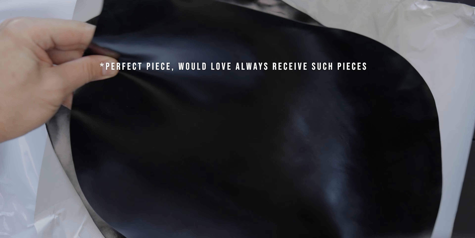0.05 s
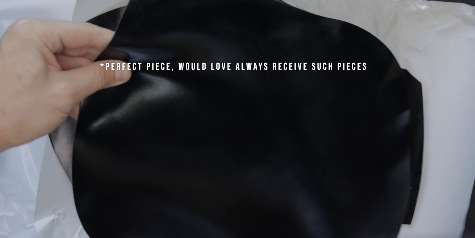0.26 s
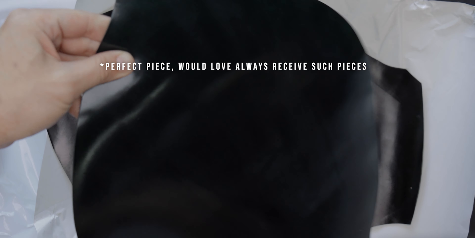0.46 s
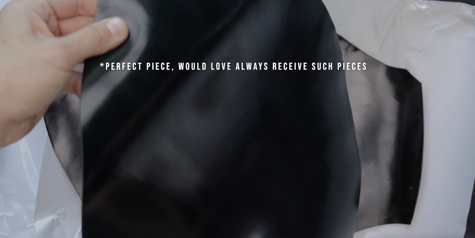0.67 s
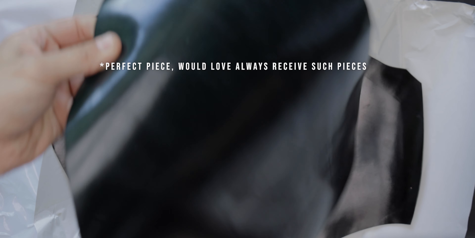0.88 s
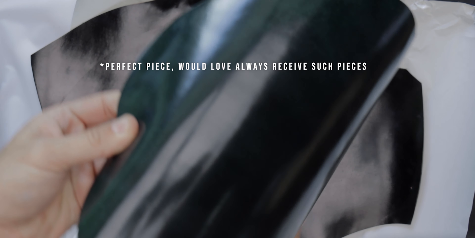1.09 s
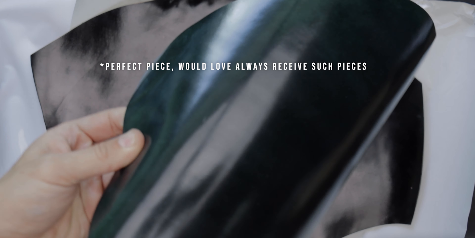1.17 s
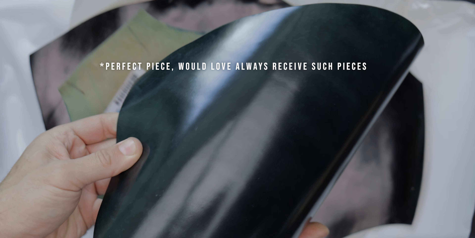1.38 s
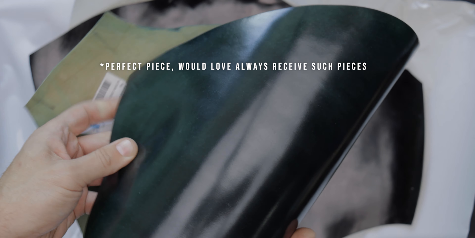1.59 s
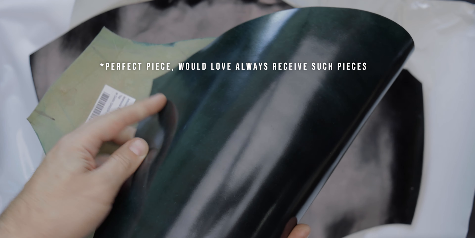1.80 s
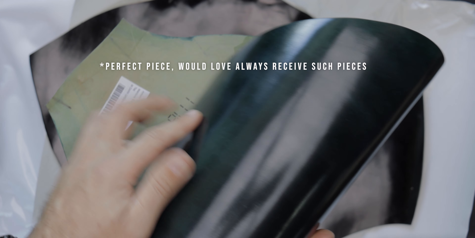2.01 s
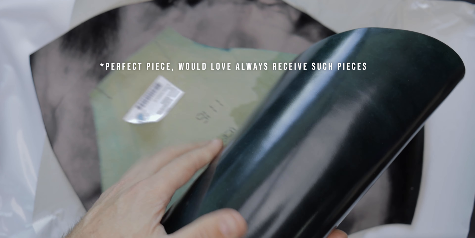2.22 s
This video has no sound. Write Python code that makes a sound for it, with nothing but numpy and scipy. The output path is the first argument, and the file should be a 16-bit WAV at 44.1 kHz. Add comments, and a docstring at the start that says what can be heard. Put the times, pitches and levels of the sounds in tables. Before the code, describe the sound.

Close up in a small room, a stiff leather hide is flexed, giving crisp snaps and soft, low flaps. It slides over other sheets with a grainy rub, bumps the table dully, and ends with a scuff and a few clicks.

```python
"""At a table in a small, echoing room, stiff leather sheets are lifted, flexed and laid over.
The hide drags over the pile with a grainy rub, a fine hiss and a hollow note from its curl.
It knocks dully on the table, flaps with soft low puffs and snaps as it buckles.
Near the end a small hard tick, probably a tag, rings briefly."""
import sys
import numpy as np
from scipy import signal
from scipy.fft import rfft, irfft
from scipy.io import wavfile
from scipy.ndimage import uniform_filter1d

SR = 44100
rng = np.random.default_rng(int(sys.argv[2]) if len(sys.argv) > 2 else 0)


def output_pcm(signal):
    """Save a mono or channel-first signal as 16-bit PCM at the path in sys.argv[1].

    Samples are clipped to [-1, 1] before scaling.
    """
    pcm = np.clip(np.atleast_2d(signal).T, -1, 1) * 32767
    wavfile.write(sys.argv[1], SR, np.round(pcm).astype(np.int16))


N = 99225
TIME = np.arange(N) / SR
CUTOFF_HZ = 16200


def from_db(db):
    """Turn decibels into a number to multiply by."""
    return 10 ** (np.asarray(db) / 20)


def rms_one(x):
    """Scale a sound so that its average strength (rms) is 1."""
    return x / np.sqrt(np.mean(x ** 2) + 1e-20)


def coloured(x, curve):
    """Make each frequency louder or softer, following (frequency [Hz], level [dB]) points."""
    hz, db = np.transpose(curve)
    bins = np.maximum(np.fft.rfftfreq(2 * N, 1 / SR), 1)
    gain = from_db(np.interp(np.log(bins), np.log(hz), db))
    return irfft(rfft(x, 2 * N) * gain)[:N]


def filtered(x, hz, keep):
    """Keep the "low" side, the "high" side or a "band" of a sound."""
    return signal.sosfilt(signal.butter(2, hz, keep, fs=SR, output="sos"), x)


def noise_band(low_hz, high_hz):
    """Noise between two frequencies, at strength 1."""
    high_hz = min(max(high_hz, low_hz * 1.1), SR * .45)
    return rms_one(filtered(rng.standard_normal(N), [low_hz, high_hz], "band"))


def resonance(hz, width_hz):
    """A band of noise with its loudness evened out: a breathy note whose pitch wanders."""
    low_hz = np.sqrt(hz ** 2 + width_hz ** 2 / 4) - width_hz / 2
    band = noise_band(low_hz, low_hz + width_hz)
    return rms_one(band / np.sqrt(uniform_filter1d(band ** 2, size=1300) + .1))


def envelope(start, rise, hold, release):
    """Loudness that climbs, stays up until hold seconds after the start, then dies away."""
    age = TIME - start
    return np.clip(age / rise, 0, 1) * np.exp(-np.clip((age - hold) / release, 0, 40))


def burst(noise, start, rise, decay):
    """A short puff of noise, with as much energy as its envelope."""
    shape = envelope(start, rise, rise, decay)
    return rms_one(noise * shape) * np.sqrt(np.mean(shape ** 2))


def ring(force, notes):
    """A push sets an object's own notes ringing, each fading at its own pace."""
    sound = 0
    for hz, db, fade_s in notes:
        shrink, turn = from_db(-60 / (fade_s * SR)), 2 * np.pi * hz / SR   # per sample
        feedback = [1, -2 * shrink * np.cos(turn), shrink ** 2]
        sound += from_db(db) * signal.lfilter([0, np.sin(turn)], feedback, force + 1e-18)
    return sound


def air():
    """The faint, steady, low rush of the room."""
    # tone of the background: (frequency [Hz], level [dB])
    tone = [(25, -9.5), (60, 4), (150, -2), (330, 5.5), (800, -3), (2000, -15.5), (6000, -21.5),
            (11000, -40.5), (16000, -47)]
    return from_db(-76.5) * rms_one(coloured(rng.standard_normal(N), tone))


def grains(per_s, spread_db=1.64):
    """Leather slides in tiny random slips of uneven size."""
    sizes = from_db(spread_db * np.minimum(rng.exponential(1, N), 4)) * rng.choice([-1, 1], N)
    return sizes * (rng.random(N) < per_s / SR)


def rub_and_hiss():
    """A coarse rub, a finer rasp, a hiss and a hollow note, mostly from the curled sheet dragging."""
    # stretches of rub and hiss: (start [s], length [s], rise [s], release [s], swell [dB],
    # rub [dB], rasp [dB], hiss [dB], hollow pitch [Hz], hollow level [dB])
    # The row at 1.151 s is a soft hiss swelling just before and through the pop at 1.2 s.
    stretches = [(0, 0.025, 0.009, 0.0037, -2, -101, -109, -110, 455, -70.5),
                 (0.042, 0.076, 0.024, 0.04, -1, -62.5, -57.5, -81, 348, -68),
                 (0.161, 0.099, 0.0034, 0.072, 11, -65, -71.5, -111, 970, -95),
                 (0.461, 0.12, 0.031, 0.048, 6.5, -55.5, -56.5, -72, 713, -61.5),
                 (0.601, 0.12, 0.031, 0.02, 1, -53.5, -50.5, -63.5, 749, -59.5),
                 (0.884, 0.1, 0.034, 0.019, 0.5, -71, -73.5, -112, 337, -74),
                 (0.95, 0.073, 0.023, 0.09, 3.5, -94, -78.5, -80, 413, -82),
                 (1.131, 0.017, 0.012, 0.015, -11.5, -59.5, -78, -82, 694, -66),
                 (1.193, 0.061, 0.031, 0.02, -12, -47.5, -78, -72.5, 600, -52.5),
                 (1.151, 0.16, 0.055, 0.021, 7.5, -104, -71.5, -71, 428, -70),
                 (1.32, 0.18, .04, 0.029, 2.5, -82.5, -64, -69, 410, -78.5),
                 (1.454, 0.087, 0.015, 0.0095, 7, -64.5, -88, -76, 501, -69.5),
                 (1.635, 0.075, 0.019, 0.017, 17.5, -62.5, -81, -100, 870, -66),
                 (1.706, 0.12, 0.029, 0.02, 2, -57, -70, -90, 517, -81),
                 (1.86, 0.048, 0.018, 0.022, 3, -53.5, -62.5, -96, 495.5, -52),
                 (1.892, 0.085, 0.063, 0.017, -2.5, -55.5, -52.5, -60.5, 479, -54),
                 (1.965, 0.2, 0.014, 0.036, -5, -73.5, -84, -64, 493, -76),
                 (2.152, 0.1, 0.024, 0.038, -7, -63.5, -66.5, -78, 486, -69.5)]
    # tones of the rub, the rasp and the hiss: (frequency [Hz], level [dB])
    rub_tone = [(40, -29), (150, -24), (300, -21.5), (450, -14.5), (650, 2.5), (1050, 3.5), (1600, -4),
                (2800, -12.5), (5000, -36), (16000, -64)]
    rasp_tone = [(100, -32), (700, -14.5), (1400, 7), (2500, 2.5), (4200, -2), (7000, -8.5), (10000, -15.5),
                 (16000, -45.5)]
    hiss_tone = [(300, -27), (800, -21.5), (1400, 4.5), (4000, 3), (8000, 5.5), (12000, 0.5), (16000, -5.5)]
    hollow_width_hz, upper_ratio, upper_db = 51.3, 1.738, -1.5
    rub_gain, rasp_gain, hiss_gain, hollow = 0, 0, 0, 0
    for start, length, rise, release, swell_db, rub_db, rasp_db, hiss_db, hz, hollow_db in stretches:
        progress = np.clip((TIME - start) / length, 0, 1)
        loudness = envelope(start, rise, length, release) * from_db(swell_db * (progress - .5))
        rub_gain += loudness * from_db(rub_db)
        rasp_gain += loudness * from_db(rasp_db)
        hiss_gain += loudness * from_db(hiss_db)
        lower = resonance(hz, hollow_width_hz)
        upper = from_db(upper_db) * resonance(hz * upper_ratio, hollow_width_hz * 2)
        hollow += loudness * from_db(hollow_db) * rms_one(lower + upper)
    judder_db = 2.5 * noise_band(21.5, 86)   # a fast, uneven shake in loudness
    rub = rms_one(coloured(grains(per_s=5000) * from_db(judder_db), rub_tone))
    rasp = rms_one(coloured(grains(per_s=13000) * from_db(judder_db / 2), rasp_tone))
    hiss = rms_one(coloured(rng.standard_normal(N), hiss_tone))
    return rub_gain * rub + rasp_gain * rasp + hiss_gain * hiss + hollow


def knocks():
    """The hide bumps the table and makes it ring; a longer touch sounds duller."""
    # bumps on the table: (time [s], level [dB], length of touch [s])
    bumps = [(.0255, -59, .0006), (.883, -58, 0.00041), (0.913, -59.5, 0.00053), (0.935, -55, 0.00035),
             (.975, -66, 0.0011), (1.141, -49, 0.0011), (1.6915, -23.5, 0.00085), (1.6987, -26, 0.00097),
             (1.7253, -33.5, 0.00026), (1.7284, -27, 0.0013), (1.8685, -41.5, 0.00056)]
    # the table's own notes: (pitch [Hz], level [dB], time to fade by 60 dB [s])
    table_notes = [(479, -0.5, 0.052), (630, 0.5, .014), (902, -9.5, 0.043), (1370, -18, .03),
                   (1920, -15.5, 0.042)]
    force = 0
    for start, db, touch in bumps:
        push = np.sin(np.pi * np.clip((TIME - start) / touch, 0, 1)) ** 2
        force += from_db(db) * push / push.sum()
    return filtered(ring(force, table_notes), hz=705, keep="high")


def flaps_and_snap_tail():
    """The swinging sheet puffs and pops; the row at 0.26 s is the loud snap's hollow, fading tail."""
    # low or hollow bursts: (time [s], level [dB], pitch [Hz], band width [Hz], rise [s], decay [s])
    bursts = [(0.049, -51.5, 246, 238, 0.0019, 0.028), (0.236, -54, 150, 280, 0.011, 0.028),
              (0.244, -51, 143, 35.7, 0.012, 0.051), (.26, -53.5, 538, 200, .01, .075),
              (.445, -62.5, 410, 283, 0.0076, .025), (.495, -67, 89, 50.4, 0.021, 0.042),
              (.55, -64.5, 148, 200, 0.011, 0.018), (.701, -62.5, 174, 260, 0.0024, 0.011),
              (0.702, -50.5, 171.4, 35.4, 0.0067, 0.035), (0.71, -44.5, 628, 216, .003, 0.012),
              (1.124, -63, 131, 330, 0.01, 0.022), (1.198, -53.5, 75, 190, 0.022, 0.026),
              (1.206, -46, 580, 50, 0.0038, 0.013), (1.235, -47, 983, 89, 0.0044, .012),
              (1.289, -68, 69, 50.4, 0.007, 0.064), (1.482, -68.5, 69.4, 70, 0.06, 0.017),
              (1.69, -50.5, 103, 130, 0.0012, 0.0094), (1.726, -54, 124, 167, .003, 0.011),
              (1.868, -65.5, 112, 81, 0.0066, .03), (1.955, -66.5, 83, 50, 0.0062, .025),
              (2.163, -62.5, 101.5, 147, 0.004, 0.015)]
    return sum(from_db(db) * burst(resonance(hz, width_hz), start, rise, decay)
               for start, db, hz, width_hz, rise, decay in bursts)


def snaps():
    """Each buckle cracks from its own spot. Gives the cracks, their echoes and their jolts to the room."""
    # the hide buckles or its edge flicks: (time [s], level [dB], rise [s], decay [s],
    # low edge [Hz], high edge [Hz], level sent to the room relative to the crack [dB])
    buckles = [(0.0512, -36.5, 0.00045, 0.00098, 900, 3960, -0.5),
               (.1498, -48, .0005, 0.0047, 1200, 1900, -4), (.229, -50.5, 0.004, 0.015, 900, 4700, -4.5),
               (0.2378, -24, 0.0008, 0.0035, 2000, 6400, 5), (0.2446, -39, 0.003, 0.017, 540, 2580, 8.5),
               (0.2519, -31, 0.0017, 0.0058, 950, 6500, 3),
               (0.3753, -41.5, 0.00021, 0.0034, 1700, 5500, -7),
               (.510, -45.5, .0006, 0.0029, 900, 2130, -13), (.553, -49, .001, 0.0038, 583, 1730, -1),
               (0.586, -51, 0.0015, 0.002, 620, 1520, -4), (0.621, -38, 0.00039, 0.002, 720, 2600, -10),
               (0.7027, -31.5, 0.0043, 0.0013, 760, 2270, -4.5),
               (0.7094, -32.5, 0.00078, 0.001, 2500, 8800, 3),
               (0.7108, -30.5, 0.00094, 0.0029, 520, 5230, -7.5),
               (0.712, -37, .002, 0.0047, 557, 1250, -30), (1.046, -66, 0.0015, 0.0065, 3000, 8000, 7.5),
               (1.77, -47, 0.00099, 0.0011, 4040, 7300, -3.5),
               (1.9472, -36.5, 0.0015, 0.0037, 2380, 3650, -1.5),
               (1.957, -36.5, 0.0032, 0.0012, 1900, 12330, 2.5),
               (1.9623, -35, 0.00056, 0.0042, 1460, 7100, -27),
               (2.0326, -47, 0.0028, 0.0037, 3060, 15100, -7)]
    cracks, echoes, jolts = 0, 0, 0
    for start, db, rise, decay, low_hz, high_hz, room_db in buckles:
        band = signal.butter(1, [low_hz, high_hz], "band", fs=SR, output="sos")
        treble_cut = signal.butter(2, 1.02 * high_hz, fs=SR, output="sos")
        tone = np.vstack([band, treble_cut])
        crack = from_db(db) * burst(signal.sosfilt(tone, rng.standard_normal(N)), start, rise, decay)
        room_gain = from_db(room_db) * crack.std()
        click = signal.unit_impulse(N, int(start * SR))
        cracks += crack
        echoes += room_gain * rms_one(signal.sosfilt(tone, reflections(start + rise) + 1e-18))
        jolts += room_gain * rms_one(signal.sosfilt(tone, click + 1e-18))
    return cracks, echoes, jolts


def tag():
    """One small hard tick, probably a tag, leaves a thin ring."""
    # the tick's notes: (pitch [Hz], level [dB], time to fade by 60 dB [s])
    notes = [(6350, 0, .13), (6620, -4, .1), (8400, -9, .12)]
    start_s, level_db = 1.7697, -62.5
    return from_db(level_db) * ring(signal.unit_impulse(N, int(start_s * SR)), notes)


def reflections(start):
    """Closely packed echoes build up quickly and die away, the treble a little sooner."""
    build_s, split_hz = 0.0017, 5800
    tail = 0
    for side, fade_s in (("low", 0.43), ("high", 0.38)):   # time to fade by 60 dB
        noise = filtered(rng.standard_normal(N), split_hz, side)
        tail += noise * envelope(start, build_s, build_s, fade_s / np.log(1000))
    return tail / np.sqrt(np.sum(tail ** 2))


def room(sound, snap_echoes, jolts):
    """The room echoes the handling, and the surroundings ring on after each snap."""
    # tone of the echoes: (frequency [Hz], level [dB])
    tone = [(60, -17.5), (200, -2.5), (600, -1), (1500, -3), (3000, -2.5), (6000, -9.5), (10000, -8),
            (16000, -10.5)]
    # notes of the surroundings: (pitch [Hz], level [dB], time to fade by 60 dB [s])
    notes = [(772, -2, 0.44), (1150, 5, 0.28), (1384, 12, 0.16), (1648, -6.5, 0.6), (1686, 5, 0.19),
             (1934, -6, 0.62), (2155, 4, 0.34), (2279, -5, 0.5), (3040, -13.5, 0.093), (3586, -13.5, .28),
             (4500, -17.5, .26)]
    echoes = snap_echoes + signal.fftconvolve(sound, reflections(0))[:N]
    return coloured(echoes, tone) + from_db(-54) * ring(jolts, notes)


def scene():
    """All the handling, its echoes and the quiet air, in one channel."""
    snap, snap_echoes, jolts = snaps()
    rustle, knock, bursts = rub_and_hiss(), knocks(), flaps_and_snap_tail()
    to_room = from_db(-8) * rustle + from_db(-9.5) * knock + from_db(-6) * bursts
    return (rustle + knock + bursts + snap + tag() + room(to_room, snap_echoes, jolts) + air())[None]


def record(dry):
    """The very highest treble is cut off steeply."""
    return signal.sosfilt(signal.ellip(12, .1, 80, CUTOFF_HZ, fs=SR, output="sos"), dry)


dry = scene()
out = record(dry)
output_pcm(out)
```